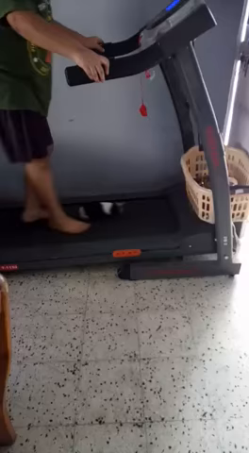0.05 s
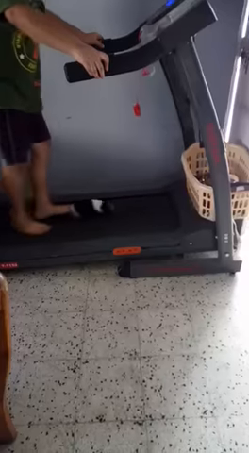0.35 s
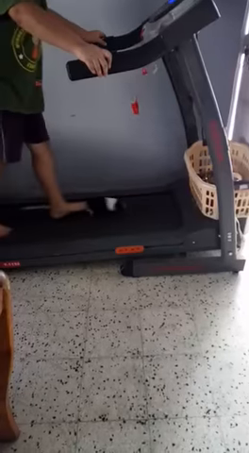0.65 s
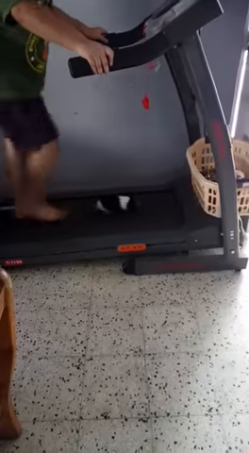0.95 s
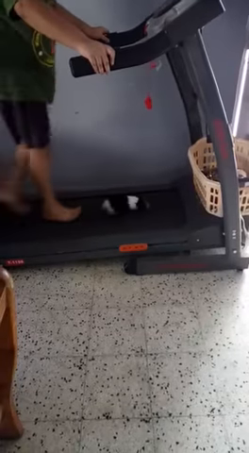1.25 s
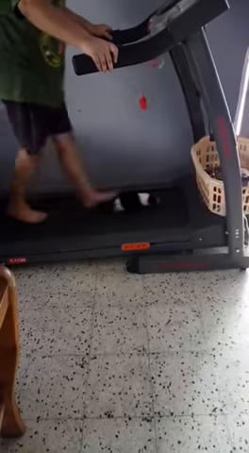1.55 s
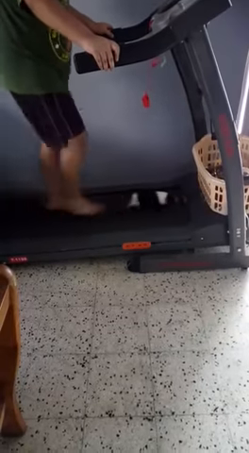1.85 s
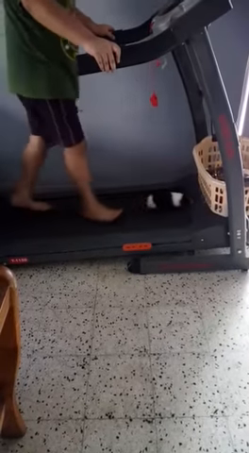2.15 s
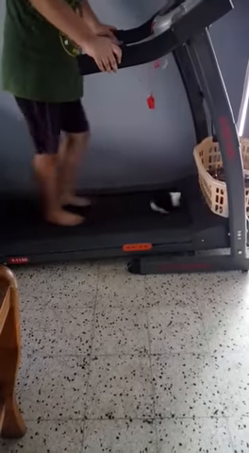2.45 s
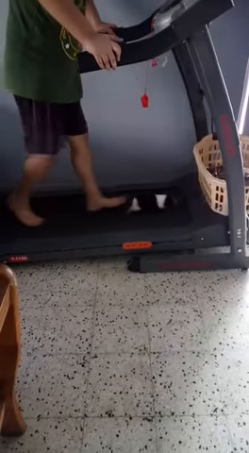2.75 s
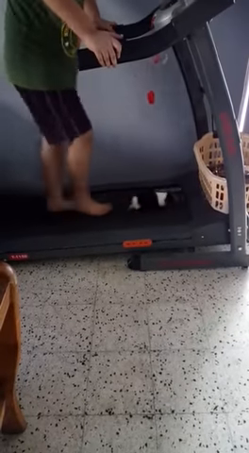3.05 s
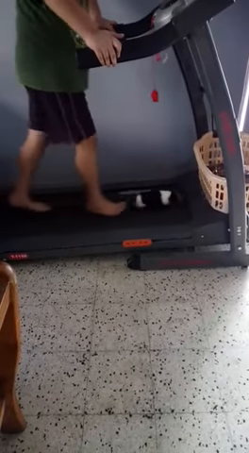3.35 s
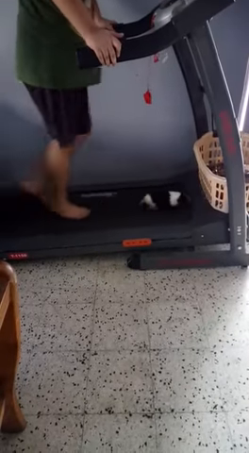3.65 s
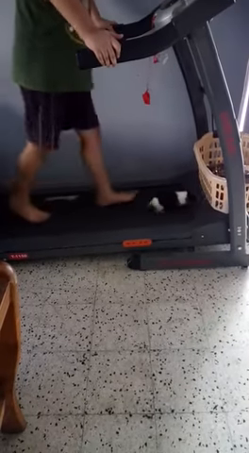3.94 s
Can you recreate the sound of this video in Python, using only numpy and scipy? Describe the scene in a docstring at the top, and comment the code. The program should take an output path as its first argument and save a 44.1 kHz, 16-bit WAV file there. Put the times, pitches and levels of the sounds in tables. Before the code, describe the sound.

A motorised treadmill runs with a steady rumble, a wavering hum and a faint ticking belt hiss. Bare feet scuff and slap on it, then land in soft thuds, a couple of metres from the microphone in a tiled room.

```python
"""Barefoot walking on a treadmill

Someone walks on a motorised treadmill in a tiled room, a couple of metres from a phone. Rollers and
belt force the deck into a rumble over the motor's hum. Friction makes the belt hiss and the soles
scuff; impacts give ticks, slaps and thuds. The phone fades in, and its left port is thin and of
opposite polarity in the bass."""
import sys
import numpy as np
from scipy import signal
from scipy.fft import rfft, irfft
from scipy.io import wavfile

SR = 44100
rng = np.random.default_rng(int(sys.argv[2]) if len(sys.argv) > 2 else 0)


def to_wav(s):
    """Save 16-bit WAV."""
    ch = np.atleast_2d(s).T  # columns
    pcm = np.round(np.clip(ch, -1, 1) * 32767)  # PCM
    wavfile.write(sys.argv[1], SR, pcm.astype(np.int16))


N = 176400
PORT_POLARITY = np.array([[-1], [1]])  # left, right


def undb(db):
    """Decibels as an amplitude ratio."""
    return 10 ** (np.asarray(db) / 20)


def seconds():
    """The time of each sample."""
    return np.arange(N) / SR


def per_bin(points):
    """A table interpolated over log frequency at every spectral bin."""
    hz, value = np.array(points).T
    return np.interp(np.log(np.arange(N // 2 + 1) * SR / N + 1e-3), np.log(hz), value)


def unit_rms(x):
    """Normalisation to an rms of 1."""
    return x / np.sqrt(np.mean(x ** 2))


def noise(spectrum):
    """Partial coherence: noise of rms 1, shaped by a relative spectrum, as it reaches two ports."""
    # likeness of the two ports: frequency_hz, correlation
    likeness = [(30, -.5), (90, -.94), (340, -0.89), (510, -0.71), (620, 0.46), (850, -0.28), (1100, 0.1),
                (1700, 0.39), (2400, -0.087), (6000, -0.035)]
    right, independent = rfft(rng.standard_normal((2, N)))
    correlation = np.clip(per_bin(likeness), -.99, .99)
    left = correlation * right + np.sqrt(1 - correlation ** 2) * independent
    return unit_rms(irfft(np.array([left, right]) * undb(per_bin(spectrum)), N))


def drift(rate_hz):
    """Random modulation: low-passed noise of rms 1."""
    hz = np.arange(N // 2 + 1) * SR / N
    return unit_rms(irfft(rfft(rng.standard_normal(N)) / (1 + (hz / rate_hz) ** 4), N))


def burst(start_s, attack_s, decay_s):
    """A transient envelope: linear rise, then exponential damping."""
    age = seconds() - start_s
    return np.clip(age / attack_s, 0, 1) * np.exp(-np.clip((age - attack_s) / decay_s, 0, 20))


def deck_rumble():
    """Forced vibration: belt and rollers shake the deck unevenly, and its main resonance throbs."""
    # rumble of rollers and belt in the deck: frequency_hz, density_db
    rumble_spectrum = [(25, -19), (48, -23.5), (66, -10.5), (82, -17), (100, -2.5), (200, -3), (330, -3.5),
                       (455, -2.5), (530, -8.5), (820, -11.5), (1020, -9), (1250, -12.5), (1650, -17.5),
                       (2900, -23), (4000, -28), (6300, -33.5), (8600, -53.5), (15000, -57)]
    # main resonance of the deck: frequency_hz, density_db
    resonance = [(150, -47), (210, -6), (280, -5), (316, 0), (350, -3), (460, -55.5)]
    rumble = noise(rumble_spectrum) * undb(-25.5 + .5 * drift(rate_hz=4.3) + .47 * drift(rate_hz=46))
    throb = noise(resonance) * undb(-37.5 + 4.5 * drift(rate_hz=12))
    return rumble + throb


def motor_hum():
    """Frequency and amplitude modulation: drive tones wander with the load and waver in strength."""
    # motor and drive tones: pitch_hz, level_db
    steady_tones = [(69, -56.5), (355, -52), (622, -43), (775, -41.5), (901, -49)]
    # the two strongest drive tones: pitch_hz
    strong_pitches = [320.7, 462.3]
    # their swelling and sinking: time_s, lower_tone_db, upper_tone_db
    swells = [(0, -39, -42), (.7, -42, -53), (1.3, -39, -50), (1.65, -50, -41), (1.87, -31, -51),
              (2.2, -45, -43), (2.5, -28.5, -45), (2.85, -32.5, -36), (3.15, -49, -48), (3.6, -35, -30),
              (4, -42, -42)]
    times, *levels = np.array(swells).T
    strong_tones = [(hz, np.interp(seconds(), times, db)) for hz, db in zip(strong_pitches, levels)]
    speed = 1 + .0059 * drift(rate_hz=2.73)
    motor_time = np.cumsum(speed) / SR
    hum = 0
    for hz, db in steady_tones + strong_tones:
        amplitude = undb(db + 2.5 * drift(rate_hz=17))
        hum += amplitude * np.sin(2 * np.pi * (hz * motor_time + rng.random()))
    return hum * PORT_POLARITY


def belt_hiss():
    """Sliding friction: the belt rubs over the deck with a flickering hiss."""
    # friction noise of the belt: frequency_hz, density_db
    spectrum = [(2000, -20), (5500, 6), (8600, -3), (12500, 4.5), (15500, -15.5)]
    # strength of the hiss: time_s, relative_level_db
    contour = [(0, -56), (.3, -59.5), (.55, -52), (.78, -52), (.9, -56.5), (1.12, -60), (1.28, -51),
               (1.5, -66), (1.66, -55), (1.85, -72), (2.05, -59), (2.14, -56), (2.3, -55), (2.6, -64),
               (2.74, -57), (3.1, -59.5), (3.47, -55.5), (3.9, -58)]
    level_db = np.interp(seconds(), *np.array(contour).T) - 4
    return noise(spectrum) * undb(level_db + 2 * drift(rate_hz=38))


def belt_ticks():
    """Damped resonance: broad clicks in belt and frame each ring in a narrow band."""
    # distinct ticks of belt and frame: start_s, level_db, ring_hz, click_ratio
    ticks = [(.331, -39.5, 5900, 0.92), (0.446, -32.5, 2920, .3), (.589, -28, 3150, 0.53),
             (.733, -38, 5500, 0.98), (.766, -34, 3070, .5), (.828, -35, 2900, .5), (.921, -34, 5030, 1.1),
             (1.424, -34, 3120, .7), (1.532, -34.5, 3020, .4), (1.802, -41, 3000, .7),
             (1.927, -34.5, 2760, .4), (1.938, -48, 5300, .4), (2.014, -37.5, 5550, .6),
             (2.24, -37, 5350, .6), (2.283, -35, 3050, .9), (2.313, -39.5, 5370, .5),
             (2.741, -43, 5400, .6), (2.926, -35.5, 3120, .5), (3.343, -34.5, 3040, .5),
             (3.734, -35, 3100, 0.55), (3.971, -33, 3100, 0.99)]
    # resonances of the faint ticks between them: ring_hz
    faint_rings = [3150, 5300]
    # click under each ring: frequency_hz, density_db
    click_spectrum = [(500, -6), (1500, -4), (3100, 5), (4400, -1), (6400, -2), (8500, -21), (15000, -36)]
    faint_per_s, decay_s, half_width_hz = 10, .0061, 110
    for when, size, which in rng.random((int(faint_per_s * N / SR), 3)):
        ticks = ticks + [(when * N / SR, -46.5 + 6 * (size - .5), faint_rings[int(2 * which)], .43)]
    t = seconds()[:SR // 20]
    rings, click_envelope = np.zeros((2, N + len(t))), 0
    for start_s, db, hz, click_ratio in ticks:
        band = signal.butter(1, [hz - half_width_hz, hz + half_width_hz], "band", fs=SR)
        ring = signal.lfilter(*band, rng.standard_normal((2, len(t)))) * np.exp(-t / decay_s)
        ring /= np.sqrt(np.sum(ring ** 2) / (decay_s * SR))
        onset = int(start_s * SR)
        rings[:, onset:onset + len(t)] += undb(db) * ring
        click_envelope += undb(db) * click_ratio * burst(start_s, .00084, decay_s)
    return rings[:, :N] + noise(click_spectrum) * click_envelope


def sole_scuffs():
    """Sliding friction: skin slips on the belt, a grainy bright swish over a duller rub."""
    # slips of the soles: start_s, relative_level_db, attack_s, decay_s, rub_weight
    slips = [(.222, -54, .01, .04, .2), (.632, -36.5, 0.014, 0.025, 1.3), (.672, -48.5, 0.0098, .035, 1.9),
             (.762, -46, .006, 0.014, 1.2), (1.268, -40, 0.014, 0.014, 0.73),
             (1.422, -40, 0.0062, .015, 0.59), (1.553, -45, .005, .025, .3), (1.69, -47, .004, .012, 0.45),
             (2.252, -37.5, 0.0082, .016, 0.5), (2.358, -26.5, 0.0034, 0.0079, 0.63),
             (2.378, -45.5, 0.0041, .03, 1.64), (2.478, -49, .005, .025, .2), (2.675, -51, .008, .02, .2),
             (2.734, -47, .005, 0.014, .3), (2.822, -48, .005, .03, .2), (3.195, -49, .005, .015, .3),
             (3.46, -49.5, .01, 0.039, 1.7), (3.595, -46, .004, .008, .4),
             (3.938, -42, 0.0055, 0.037, 0.66), (3.968, -34, 0.0058, .007, 0.37)]
    # bright swish: frequency_hz, density_db
    swish_spectrum = [(1000, -21), (4000, 14.5), (6500, 2.5), (9000, -1), (13000, 7.5), (16000, -11)]
    # dull rub: frequency_hz, density_db
    rub_spectrum = [(200, -20), (1000, 6), (3000, 2), (6400, -1), (8500, -12.5), (15000, -21)]
    swish, rub = noise(swish_spectrum), undb(9.5) * noise(rub_spectrum)
    scuffs = sum(undb(db) * burst(start_s, attack_s, decay_s) * (swish + rub_weight * rub)
                 for start_s, db, attack_s, decay_s, rub_weight in slips)
    grain = unit_rms(undb(drift(rate_hz=420)))
    return scuffs * grain * undb(-2.5)


def sole_slaps():
    """Modal ringing after impact: a flat sole cracks on the belt and rings the board under it."""
    # flat landings: start_s, ring_gain_db, crack_db
    slaps = [(0.639, -33, -45), (0.746, -26.5, -39), (.81, -28, -44), (1.415, -25, -51),
             (2.361, -26.5, -33)]
    # modes of the running board: pitch_hz, relative_level_db
    modes = [(250, -3.5), (355, 3.5), (450, -7.5)]
    # crack of skin on the belt: frequency_hz, density_db
    crack_spectrum = [(200, -12), (450, 4), (1500, 3), (2800, 2), (4500, -7), (7000, -16), (15000, -29)]
    t, crack, sound = seconds(), noise(crack_spectrum), 0
    for start_s, ring_gain_db, crack_db in slaps:
        ring = sum(undb(db) * np.sin(2 * np.pi * (hz * t + rng.random())) for hz, db in modes)
        sound += undb(ring_gain_db) * burst(start_s, attack_s=.0068, decay_s=.042) * ring * PORT_POLARITY
        sound += undb(crack_db) * burst(start_s, attack_s=.002, decay_s=.024) * crack
    return sound


def heel_thuds():
    """Soft impact: a slow contact excites mainly low frequencies, a thud over the deck's boom."""
    # heel landings: start_s, level_db, boom_ratio
    steps = [(1.1, -33.5, 0.16), (1.62, -28.5, 0.15), (2.24, -35, 0.11), (2.77, -31, 0.64),
             (3.16, -28.5, 0.17), (3.37, -26.5, .1), (3.68, -42, .1)]
    # thud of a heel: frequency_hz, density_db
    thud_spectrum = [(30, -33), (70, -20), (110, 5), (180, 14.5), (330, -23), (700, -25), (2000, -58)]
    # lowest sway of the deck: frequency_hz, density_db
    boom_spectrum = [(30, -20), (50, 2), (65, 15), (85, 0), (150, -36)]
    thud, boom = noise(thud_spectrum), noise(boom_spectrum)
    return sum(undb(db) * burst(start_s, attack_s=.034, decay_s=.068) * (thud + boom_ratio * boom)
               for start_s, db, boom_ratio in steps)


def tiled_room(direct, t60_s=.31, tail_db=-3.5):
    """Reverberation: reflections from tiles and bare walls add a diffuse, decaying tail."""
    t = seconds()[:SR]
    tail = rng.standard_normal((2, SR)) * np.exp(-np.log(1000) * t / t60_s) * (t > .005)
    tail /= np.sqrt(np.sum(tail ** 2, axis=1, keepdims=True))
    return direct + undb(tail_db) * signal.fftconvolve(direct, tail, axes=1)[:, :N]


def scene():
    """Superposition: machine and feet add up; scuffs, hiss and ticks also reverberate."""
    low_sounds = deck_rumble() + motor_hum() + heel_thuds() + sole_slaps()
    return low_sounds + tiled_room(sole_scuffs() + belt_hiss() + belt_ticks())


def record(dry):
    """Frequency response: each port colours the sound; the phone fades in and cuts the top."""
    # response of the left port: frequency_hz, gain_db
    left_port = [(25, -21), (60, -32), (120, -32.5), (200, -26.5), (320, -19), (480, -11), (700, -8.5),
                 (1000, -12.5), (1350, -16), (2100, -3.5), (3100, -12), (4000, -7), (5400, 1), (6600, -2),
                 (7800, -16.5), (8700, -6), (11000, -15), (14500, -8.5)]
    # response of the right port: frequency_hz, gain_db
    right_port = [(1250, 0), (1650, -1.5), (2150, -8), (2900, 0.5), (3900, -4), (4450, -16.5), (4700, -38),
                  (5100, -10.5), (6300, 0.5), (7000, -2), (7800, -32), (8600, -0.5), (15000, -1)]
    opens_s, fade_s, cutoff_hz = .03, .29, 15450
    coloured = irfft(rfft(dry) * undb([per_bin(left_port), per_bin(right_port)]), N)
    fade_in = np.clip((seconds() - opens_s) / fade_s, 0, 1)
    low_pass = signal.ellip(10, .2, 80, cutoff_hz, fs=SR, output="sos")
    return signal.sosfilt(low_pass, coloured * fade_in)


dry = scene()
out = record(dry)
to_wav(out)
```